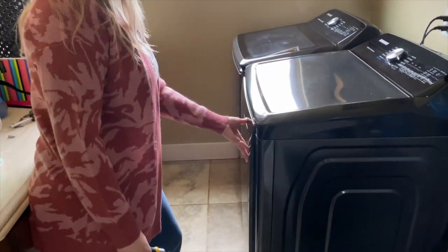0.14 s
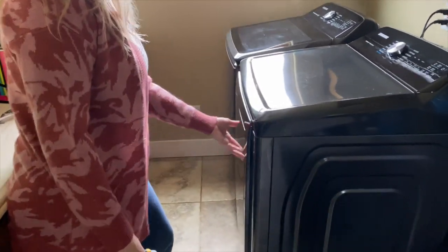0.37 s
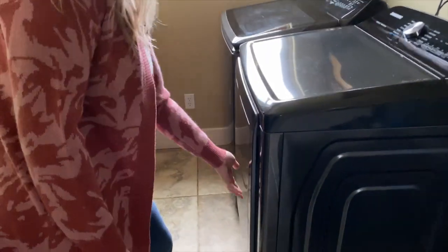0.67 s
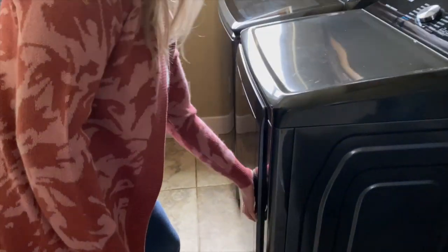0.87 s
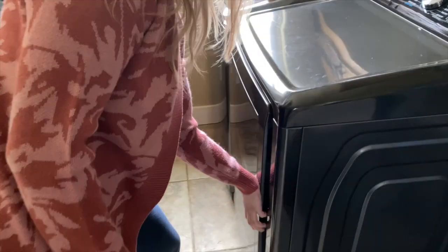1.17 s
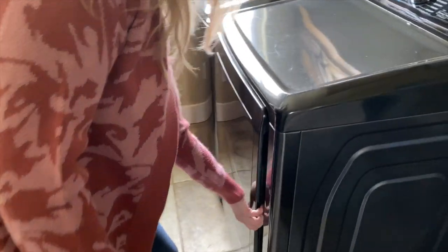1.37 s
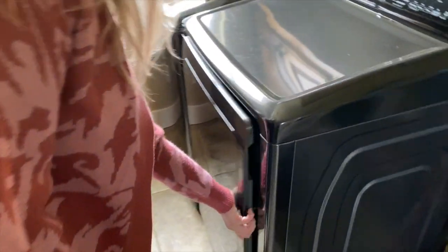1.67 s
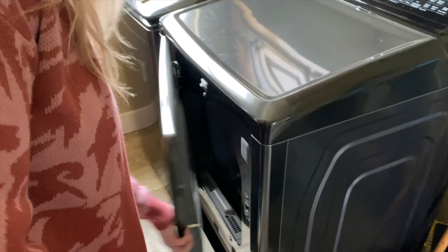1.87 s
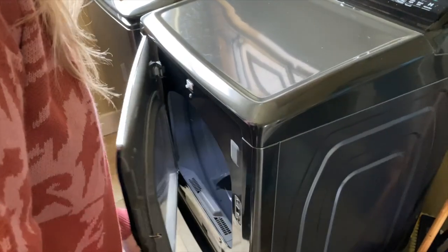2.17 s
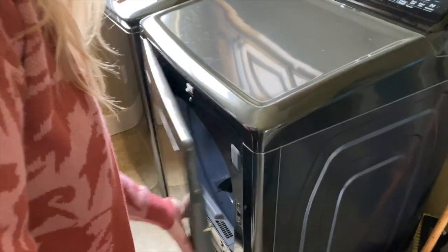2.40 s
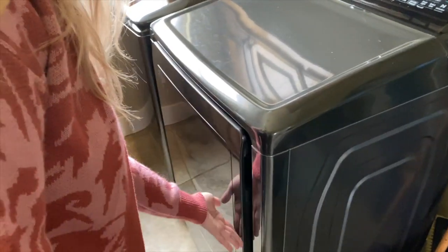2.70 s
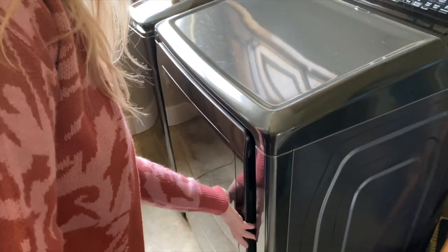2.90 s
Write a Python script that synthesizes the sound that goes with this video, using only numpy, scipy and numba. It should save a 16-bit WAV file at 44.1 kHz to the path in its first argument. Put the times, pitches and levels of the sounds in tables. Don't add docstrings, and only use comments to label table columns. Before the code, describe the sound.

After a soft bump and quiet footsteps on tile, a washer door pops open sharply and slams shut about a second later, steel panels and drum ringing. Close handheld stereo pickup, short room echo, faint low rumble.

```python
import sys
import numpy as np
from scipy import signal
from scipy.fft import rfft, irfft
from scipy.io import wavfile
from scipy.ndimage import uniform_filter1d
from numba import njit

SR = 44100
rng = np.random.default_rng(int(sys.argv[2]) if len(sys.argv) > 2 else 0)


def to_wav(sig):
    pcm = np.clip(np.atleast_2d(sig), -1, 1) * 32767
    pcm = np.round(pcm).astype(np.int16)
    wavfile.write(sys.argv[1], SR, pcm.T)


def ratio(d):
    e = np.asarray(d, float) / 20
    return 10 ** e


N = 134505
LEAD_S = 0.3
LEAD = int(LEAD_S * SR)
M = N + LEAD
T = np.arange(M) / SR - LEAD_S

# (frequency [Hz], level [dB])
AIR_HZ_DB = [(30, -21.5), (60, -4), (150, -12.5), (240, -19.5), (400, -23.5), (2500, -38.5), (7000, -44),
             (15500, -60.5)]
# (time [s], level [dB], decay [s], tilt [dB/octave])
BLOWS = [(-.12, -39.5, 0.066, -4), (.098, -51, 0.052, 2.5), (.121, -47, 0.018, -2.5), (.128, -52, .02, 1),
         (.1366, -44, 0.019, 4), (.146, -37.5, 0.018, 4), (.17, -37.5, 0.013, -4.5), (.697, -56, 0.01, -.5),
         (1.217, -72, 0.018, 3), (1.702, -52, 0.017, 3.5), (1.7105, -22, 0.0062, 3),
         (1.717, -26, 0.0084, 1.5), (1.724, -22, 0.015, -2.5), (1.733, -27, 0.015, -1),
         (1.745, -27.5, 0.014, -3.5), (2.564, -57.5, 0.017, -0.5), (2.5755, -24.5, 0.01, 1),
         (2.579, -29, 0.0088, 0), (2.588, -21, 0.014, -2.5), (2.599, -23.5, 0.016, -2.5),
         (2.61, -26.5, 0.033, -6), (3.035, -49.5, 0.0091, -1)]
# (frequency [Hz], level [dB])
LATCH_HZ_DB = [(120, -30.5), (250, -11), (450, -12), (800, -12), (1100, -9), (3300, -13.5), (7000, -20),
               (12000, -29.5), (15500, -37.5)]
# (frequency [Hz], level [dB], t60 [s])
PANEL_MODES = [(546, 0.5, 0.38), (609.3, 2, 0.05), (697.5, -29.5, 0.24), (802, -7.5, 0.39), (890, 6, 0.061),
               (940, -14.5, 0.05), (1090, -12.5, 0.2), (1096, 6, 0.053), (1280, -2.5, 0.05),
               (1310, -13, 0.097), (1548, -7, 0.35), (1730, 15.5, 0.04), (1850, 12, 0.04)]
# (time [s], level [dB], push length [s], shake length [s], lowest pitch [Hz])
BOOMS = [(-.1, -42, 0.0058, 0.046, 39.74), (0.086, -38, 0.0013, 0.051, 75.1),
         (0.141, -39.5, 0.0052, 0.0076, 37.7), (0.178, -40, 0.0057, 0.011, 47.7),
         (1.733, -25.5, 0.0008, 0.012, 194), (1.762, -41, 0.003, 0.044, 44.7),
         (2.584, -21.5, 0.0025, 0.018, 60), (2.613, -31.5, 0.0055, 0.022, 60),
         (3.009, -46.5, 0.0021, 0.041, 51.1), (0.874, -56, 0.01, 0.017, 60),
         (1.244, -51, 0.0019, 0.037, 60), (1.425, -61.5, 0.0049, 0.033, 51.1),
         (0.99, -58, 0.004, 0.022, 40)]
# (frequency [Hz], level [dB], t60 [s])
CABINET_MODES = [(54.1, -17.5, 0.1), (65.2, -6.5, 0.85), (76.8, 1, 0.2), (102.5, -6, 0.32),
                 (130.4, -1, 0.15), (163.1, 3, 0.15), (190.4, -5, 0.26), (235, -12, 0.12),
                 (278.4, -3.5, 0.22), (338.5, -8, 0.27), (356, -8.5, 0.14), (486, -13.5, 0.26)]
# (time [s], level [dB], pitch [Hz], rise [s], decay [s])
KNOCKS = [(0.128, -37, 614, 0.0072, 0.016), (0.218, -46, 570, 0.0036, 0.02),
          (0.648, -56.5, 800, 0.0018, 0.009), (0.69, -62, 1900, 0.007, .04),
          (0.995, -58, 1042, .002, 0.014), (1.004, -63, 2300, .015, .03), (1.361, -66.5, 700, 0.0078, 0.11),
          (1.627, -57.5, 800, 0.013, 0.042), (1.706, -26.5, 884, 0.0024, 0.031),
          (1.736, -32, 766, 0.0068, 0.0094), (1.73, -53, 1560, 0.011, 0.017),
          (2.563, -51, 4500, 0.0033, 0.017), (2.573, -28.5, 1270, .002, 0.013),
          (2.596, -40, 1950, 0.0055, .03), (2.614, -41.5, 846, .003, 0.017), (.077, -56, 6450, .001, .003),
          (-.08, -60, 4000, .01, .1), (.1, -64, 6300, .002, .02), (1.722, -40, 3400, .005, .02),
          (1.72, -44, 5000, .004, .015), (2.595, -36, 3300, .005, .02), (.42, -70, 1400, .03, .05),
          (1.76, -42, 1700, .01, .04), (1.225, -67, 4200, .01, .04)]
# (time [s], level [dB], pitch [Hz], t60 [s])
RINGS = [(1.735, -29, 243, .75), (1.76, -42, 172, .9), (1.725, -42, 3270, .1), (2.595, -40, 3270, .12),
         (2.59, -43, 3100, .12), (1.74, -44, 1075, 0.23), (1.74, -46, 861, .4), (1.74, -50, 748, 0.59),
         (1.74, -43, 1500, .25), (2.598, -21, 239.5, .6), (2.6, -32.5, 104, 0.47), (2.605, -21, 78, .4),
         (2.6, -32, 162, .3), (2.6, -42, 360, .3), (.165, -38, 60, .3), (.08, -40, 53, .2),
         (2.594, -33, 530, 0.45), (2.6, -41, 464, 0.43), (2.59, -39, 861, 0.37), (2.59, -44, 1460, 0.27),
         (2.59, -44, 1084, 0.18)]
# (time of peak [s], level [dB], rise [s], fall [s], tilt [dB/octave])
SCUFFS = [(0.527, -72.5, 0.017, 0.022, 7.5), (0.425, -64, 0.04, 0.087, -3.5), (2.1, -62, .03, 0.064, -3),
          (0.42, -80, 0.019, 0.035, -11), (0.86, -70, 0.11, 0.13, 1.5), (0.998, -61.5, 0.046, 0.059, 6),
          (1.231, -61, 0.026, 0.099, 6), (1.41, -71, 0.02, 0.17, 3), (1.46, -62, .025, .035, 7),
          (2.068, -57.5, 0.068, 0.085, 4.5), (2.45, -103, 0.061, .08, -18), (3, -73, 0.043, .05, -13),
          (2.95, -57.5, 0.068, 0.1, -4)]
# (frequency [Hz], level [dB])
SOLE_HZ_DB = [(250, 0), (600, 4), (1500, 1), (4000, -7), (5600, -15), (7000, -12), (9500, -22),
              (15500, -30)]
# (time of middle [s], level [dB], pitch [Hz], length [s])
THUMPS = [
    (.9, -40, 166.3, 0.049),
    (0.901, -53.5, 89, 0.1),
    (1.031, -54, 64, 0.14),
    (1.16, -52, 60, 0.027),
    (1.309, -48, 83.9, 0.14),
    (1.31, -49.5, 160, 0.23),
    (1.47, -55, 77, 0.21),
    (0.552, -50, 60, 0.1),
]
# (frequency [Hz], t60 [s], likeness of the two ports [0-1])
ROOM = [(60, 0.8, 0.97), (147, .9, .95), (339, 0.66, 0.6), (800, 0.56, 0.06), (2000, 0.5, 0),
        (4900, 0.48, 0.01), (9720, 0.33, 0.4), (14100, 0.31, 0.94)]
# (frequency [Hz], level [dB])
MIC_HZ_DB = [(1700, 1), (2500, -2), (3300, 1.5), (4500, 0.5), (5700, -1.5), (7000, 1), (9000, -2),
             (11000, 1)]

AIR_DB, AIR_SWELL_DB = -61, 1.2
CORNERS = 3
PANEL_DB, WET_DB, LEFT_DB = -20.5, 3, 0.5
KNOCK_WIDTH = 0.41
RING_RISE_S = 0.012
BASS_LAG_SAMPLES, TREBLE_LAG_SAMPLES, TURN_HZ = 18.5, 10, 1800
BASS_CUT_HZ = 31
DEAF_MID_HZ, TOP_MID_HZ = (12700, 14450), 15850
DEAF_SIDE_HZ, TOP_SIDE_HZ = (10300, 12000), 15100
LIMIT_DB, RATIO, RELEASE_S, AHEAD_SAMPLES = -5.5, 3, 0.06, 64


def unit(x):
    return x / np.sqrt(np.mean(x ** 2) + 1e-30)


def colour(x, points, tilt_db=0.):
    octave = np.log2(np.arange(2049) * SR / 4096 + 5)
    hz, level_db = np.array(points, float).T
    db = np.interp(octave, np.log2(hz), level_db) + tilt_db * (octave - np.log2(1500))
    cepstrum = irfft(db * np.log(10) / 20)
    cepstrum[1:2048] *= 2
    cepstrum[2049:] = 0
    h = irfft(np.exp(rfft(cepstrum)))
    h = (h / np.sqrt(np.sum(h ** 2))).reshape((1,) * (x.ndim - 1) + (-1,))
    return signal.oaconvolve(x, h, axes=-1)[..., :x.shape[-1]]


def ring(modes):
    t = np.arange(SR)[:, None] / SR
    hz, db, t60 = np.array(modes, float).T
    tones = ratio(db) * np.sin(2 * np.pi * hz * t) * np.exp(-np.log(1000) * t / t60)
    return unit(tones.sum(1)) / np.sqrt(SR)


def conv(x, h):
    return signal.fftconvolve(x, h)[:M]


def grit(spread_db):
    return unit(rng.standard_normal((3, M)) * ratio(spread_db * rng.exponential(size=M)))


def fall(s, length):
    return (T >= s) * np.exp(-np.clip(T - s, 0, None) / length)


def around(s, before, after):
    first = max(int((s - before + LEAD_S) * SR), 0)
    last = min(int((s + after + LEAD_S) * SR), M)
    return slice(first, last)


def ports(x):
    f = np.arange(len(x) // 2 + 1) * SR / len(x)
    turn = np.clip(f / TURN_HZ - 1, 0, 1)
    lag = BASS_LAG_SAMPLES + (TREBLE_LAG_SAMPLES - BASS_LAG_SAMPLES) * turn
    phase = 2 * np.pi * f / SR * lag + np.pi * turn
    return np.array([x, irfft(rfft(x) * np.exp(-1j * phase), len(x))])


def power_share(x, hz, share):
    n = x.shape[-1]
    gain = np.sqrt(np.interp(np.arange(n // 2 + 1) * SR / n, hz, share))
    return irfft(rfft(x) * gain, n)


def spread(shared, left, right):
    hz, _, like = np.array(ROOM).T
    like = np.clip(like, 0.01, 0.99)
    return power_share(ports(shared), hz, like) + power_share(np.array([left, right]), hz, 1 - like)


def air():
    swell = uniform_filter1d(rng.standard_normal(M), size=3000)
    swell = unit(uniform_filter1d(swell, size=3000))
    rumble = colour(spread(*rng.standard_normal((3, M))), AIR_HZ_DB)
    return ratio(AIR_DB + AIR_SWELL_DB * swell) * rumble


def latch():
    grains = grit(1.2)
    spots = np.zeros((CORNERS, 3, M))
    for k, (s, db, length, tilt) in enumerate(BLOWS):
        part = around(s, 0, 0.5)
        burst = grains[:, part] * fall(s, length)[part]
        spots[k % CORNERS, :, part] += ratio(db) * colour(burst, LATCH_HZ_DB, tilt)
    return spots


def steel_panels(spots):
    return ratio(PANEL_DB) * conv(spots[:, 0].sum(axis=0), ring(PANEL_MODES))


def room(x):
    t = np.arange(SR) / SR
    room_hz, room_t60, _ = np.array(ROOM).T
    noise, tail = spread(*rng.standard_normal((3, SR))), 0
    for hz in 40 * 2 ** np.arange(0, 9, 0.5):
        t60 = np.interp(np.log(hz), np.log(room_hz), room_t60)
        sos = signal.butter(2, [hz / 1.19, hz * 1.19], "band", fs=SR, output="sos")
        band = signal.sosfiltfilt(sos, noise * (t > 0))
        tail = tail + band * np.exp(-np.log(1000) * t / t60)
    tail = unit(tail * (1 - np.exp(-t / 0.001))) / np.sqrt(SR)
    return np.array([conv(x, h) for h in tail])


def cabinet():
    noise, push = rng.standard_normal(M), 0
    for s, db, soft, shake, low_hz in BOOMS:
        swell = np.clip(T - s, 0, None) / shake
        force = noise * swell * np.exp(-swell)
        force = signal.lfilter([1], [1, -np.exp(-4 / (soft * SR))], force)
        force = signal.lfilter(*signal.butter(2, low_hz, "high", fs=SR), force)
        push = push + ratio(db) * force / np.sqrt(np.sum(force ** 2) / SR * 20)
    return conv(push, ring(CABINET_MODES)) / 4


def knocks():
    grains, out = grit(0.53), 0
    for s, db, hz, rise, length in KNOCKS:
        edges_hz = [hz / (1 + KNOCK_WIDTH), hz * (1 + KNOCK_WIDTH)]
        sos = signal.butter(2, edges_hz, "band", fs=SR, output="sos")
        burst = grains * fall(s, length) * (1 - fall(s, rise))
        out = out + ratio(db) * signal.sosfilt(sos, burst) * np.sqrt(SR / hz)
    return out


def rings():
    out = 0
    for s, db, hz, t60 in RINGS:
        envelope = fall(s, t60 / np.log(1000)) * (1 - fall(s, RING_RISE_S))
        out = out + ratio(db) * np.sin(2 * np.pi * hz * T) * envelope
    return out


def slippers():
    grains, out = grit(0.87), np.zeros((3, M))
    for s, db, rise, fade, tilt in SCUFFS:
        part = around(s, 0.5, 0.5)
        swell = np.exp(-((T - s) / np.where(T < s, rise, fade)) ** 2)
        out[:, part] += ratio(db) * colour(grains[:, part] * swell[part], SOLE_HZ_DB, tilt)
    return out


def heels():
    out = 0
    for s, db, hz, length in THUMPS:
        bump = np.exp(-8 * ((T - s) / length) ** 2)
        out = out + 1.14 * ratio(db) * bump * np.sin(2 * np.pi * hz * (T - s))
    return out


def scene():
    spots = latch()
    panels = steel_panels(spots)
    feet = slippers() + knocks()
    low = cabinet() + rings()
    echo = sum(room(x[0]) for x in spots) + room(feet[0] + panels + 0.19 * low)
    direct = spread(*(spots.sum(axis=0) + feet)) + ports(panels + low + heels())
    out = direct + ratio(WET_DB) * echo + air()
    balance = ratio(np.array([[LEFT_DB], [-LEFT_DB]]) / 2)
    return (out * balance)[:, LEAD:]


def lost(x, gap_hz, top_hz):
    gap = signal.ellip(4, 0.2, 25, gap_hz, "bandstop", fs=SR, output="sos")
    top = signal.ellip(6, 0.2, 30, top_hz, fs=SR, output="sos")
    return x - signal.sosfiltfilt(np.vstack([gap, top]), x)


@njit
def follow(x, attack, release):
    e, y = 0., np.empty(len(x))
    for i in range(len(x)):
        e += (x[i] - e) * (attack if x[i] > e else release)
        y[i] = e
    return y


def top_cut(x):
    return signal.sosfilt(signal.butter(12, 16970, fs=SR, output="sos"), x)


def record(dry):
    bass_cut = signal.butter(3, BASS_CUT_HZ, "high", fs=SR, output="sos")
    x = signal.sosfilt(bass_cut, colour(dry, MIC_HZ_DB))
    mid_lost = lost((x[0] + x[1]) / 2, DEAF_MID_HZ, TOP_MID_HZ)
    side_lost = lost((x[0] - x[1]) / 2, DEAF_SIDE_HZ, TOP_SIDE_HZ)
    strip = mid_lost + side_lost * np.array([[1], [-1]])
    top = np.abs(strip).max(axis=0)
    usual = follow(top, 1 / (0.006 * SR), 1 / (0.1 * SR)) + ratio(-80)
    sharp = uniform_filter1d(top, size=200) / usual
    x = x - strip * (1 - np.clip(2 * sharp - 2.1, 0, 1))
    x = signal.sosfilt(signal.butter(8, 16500, fs=SR, output="sos"), x)
    peak = follow(np.abs(x).max(axis=0), 1 / (0.0005 * SR), 1 / (RELEASE_S * SR))
    over = ratio(LIMIT_DB) / (np.roll(peak, -AHEAD_SAMPLES) + 1e-9)
    gain = np.minimum(1, over) ** (1 - 1 / RATIO)
    return top_cut(x * gain)


dry = scene()
out = record(dry)
to_wav(out)
```